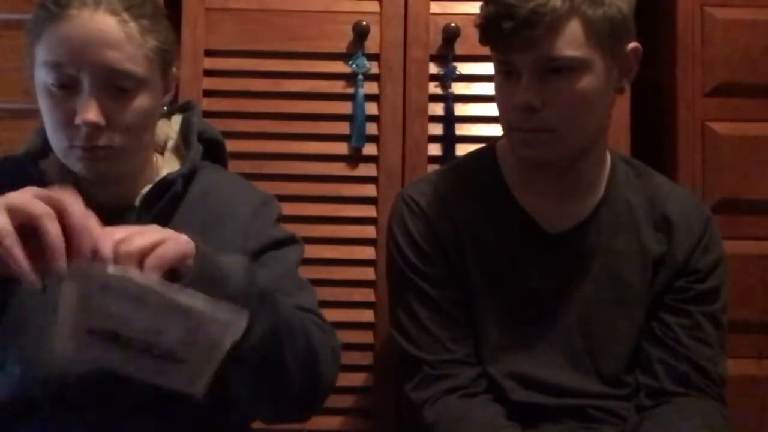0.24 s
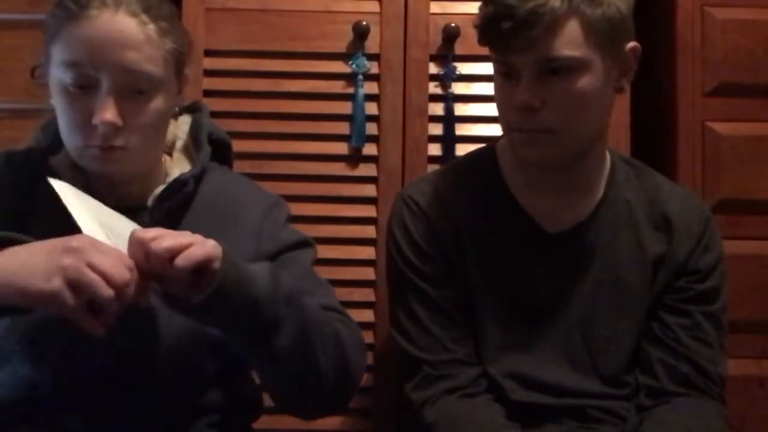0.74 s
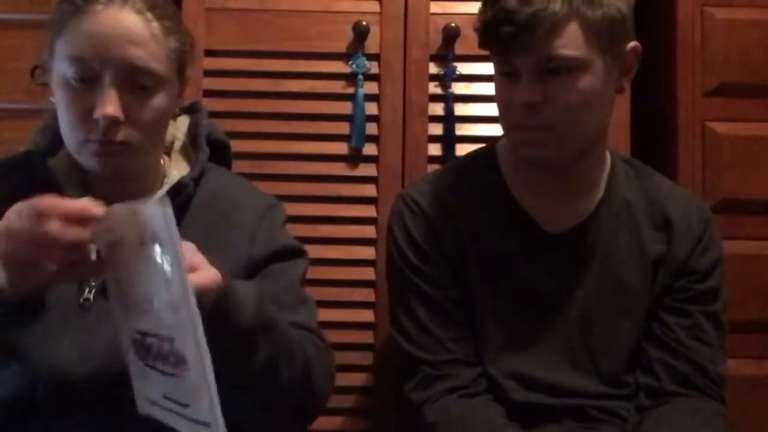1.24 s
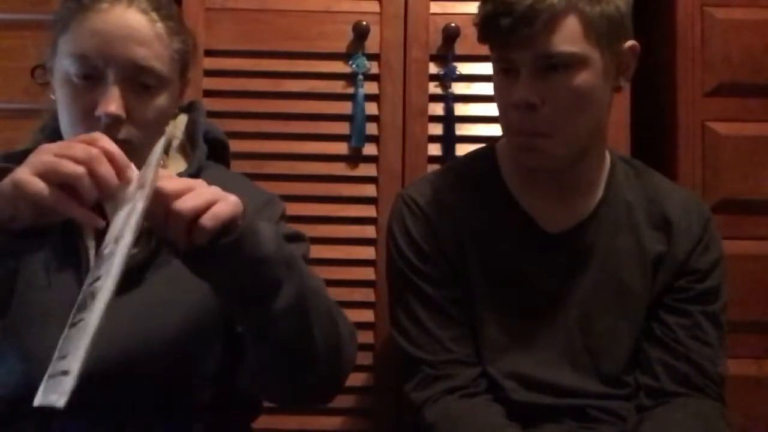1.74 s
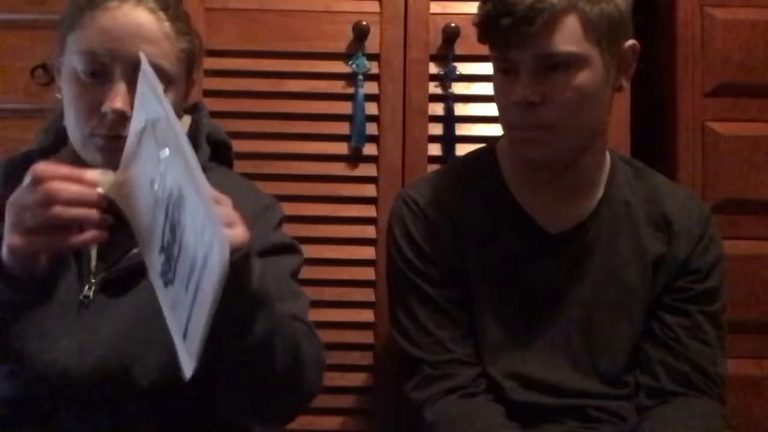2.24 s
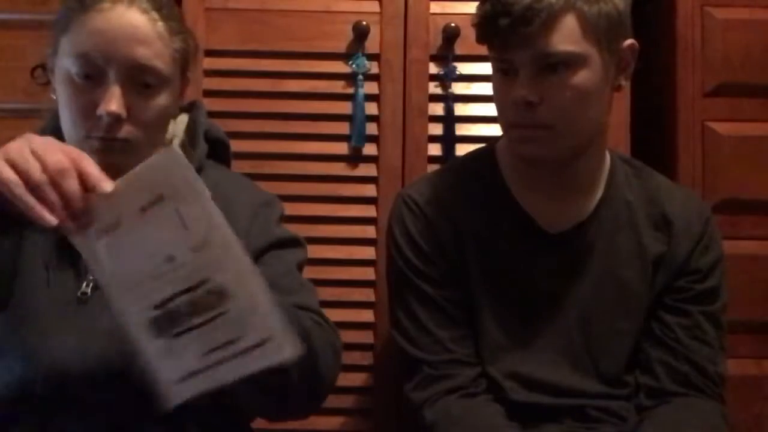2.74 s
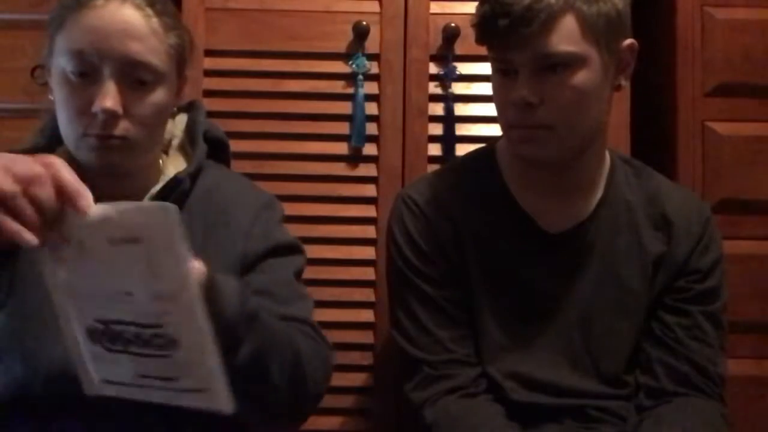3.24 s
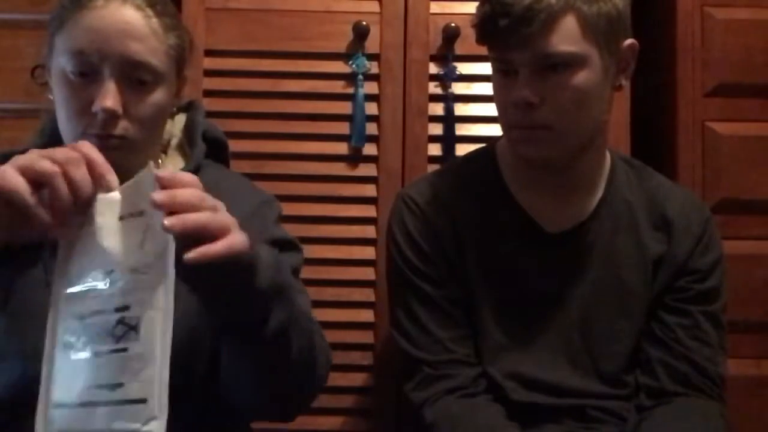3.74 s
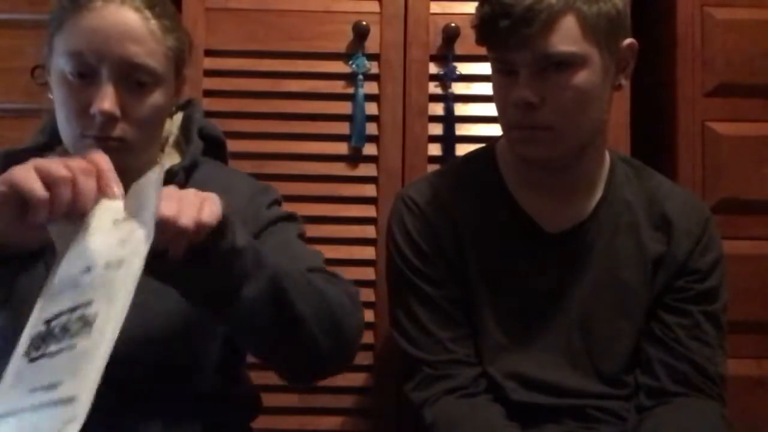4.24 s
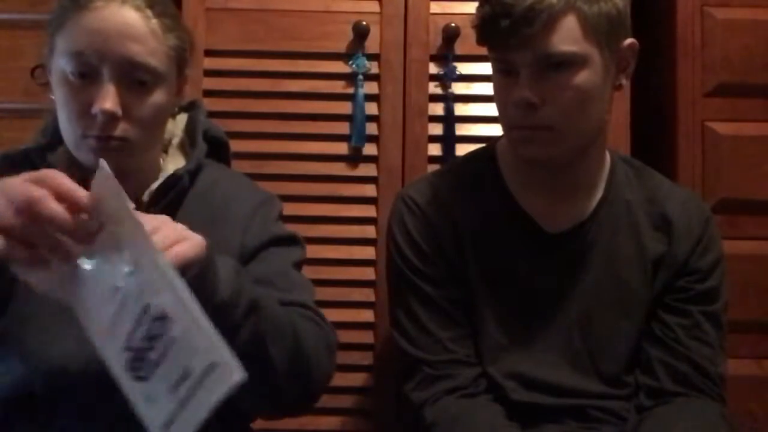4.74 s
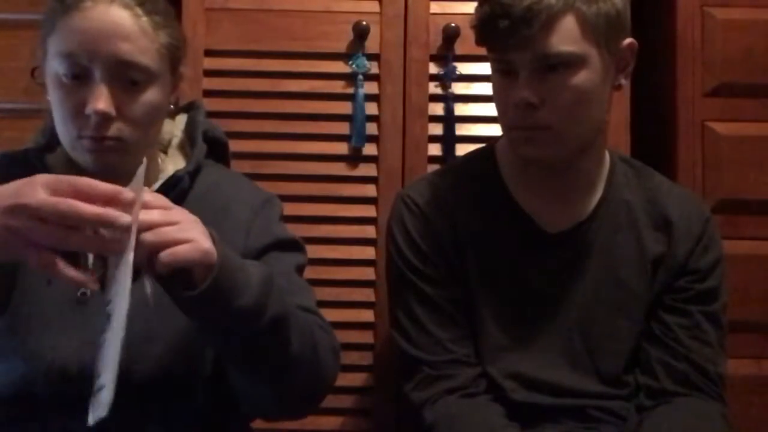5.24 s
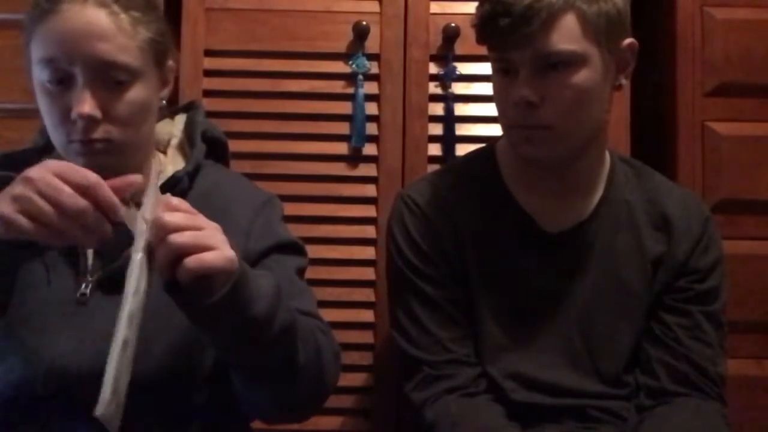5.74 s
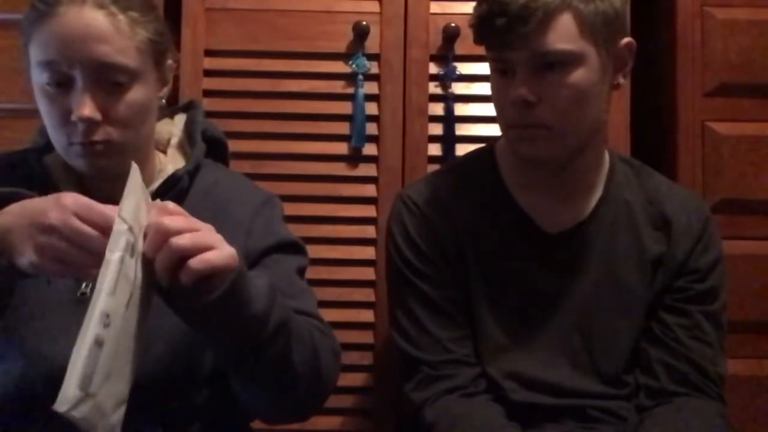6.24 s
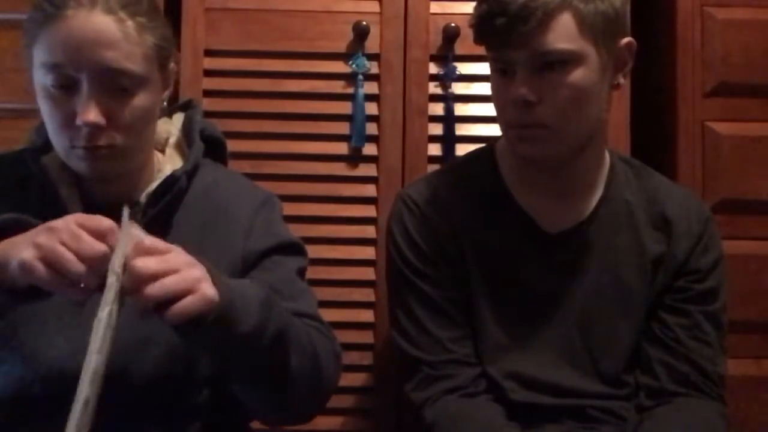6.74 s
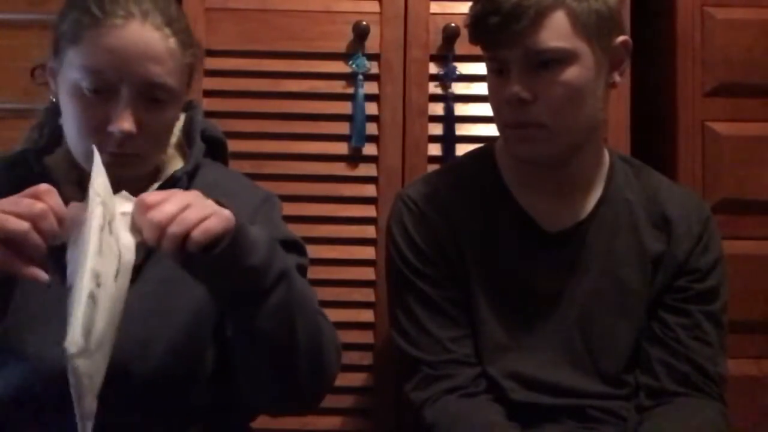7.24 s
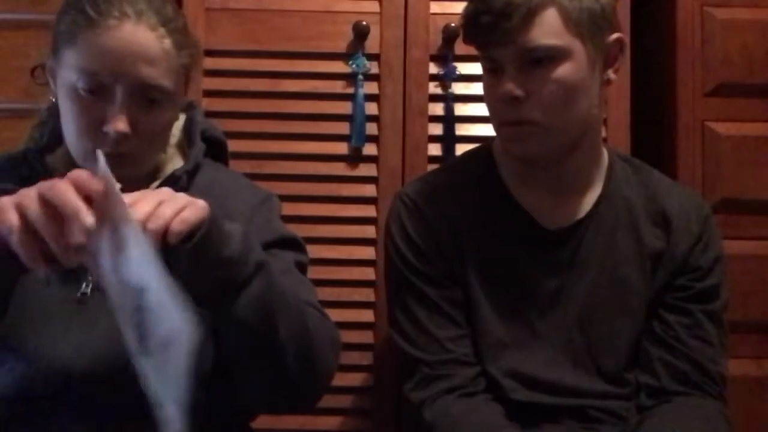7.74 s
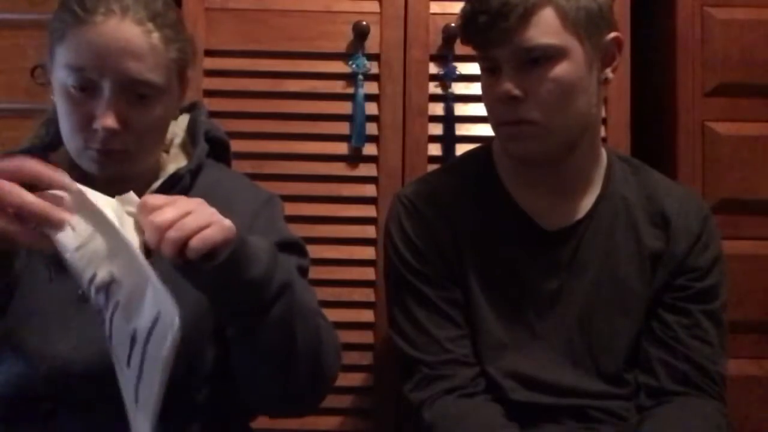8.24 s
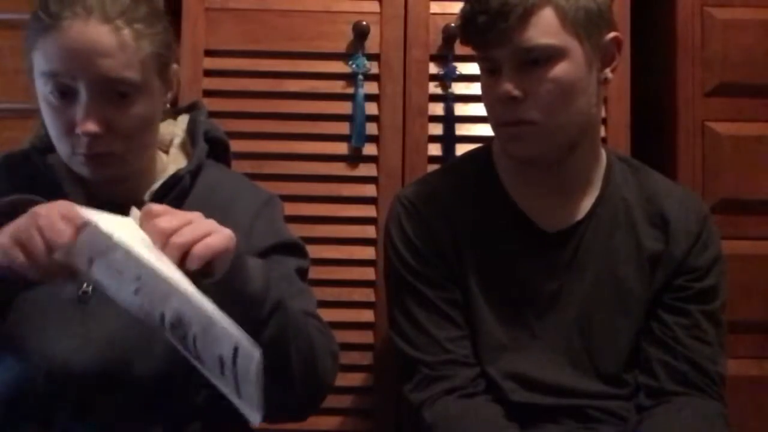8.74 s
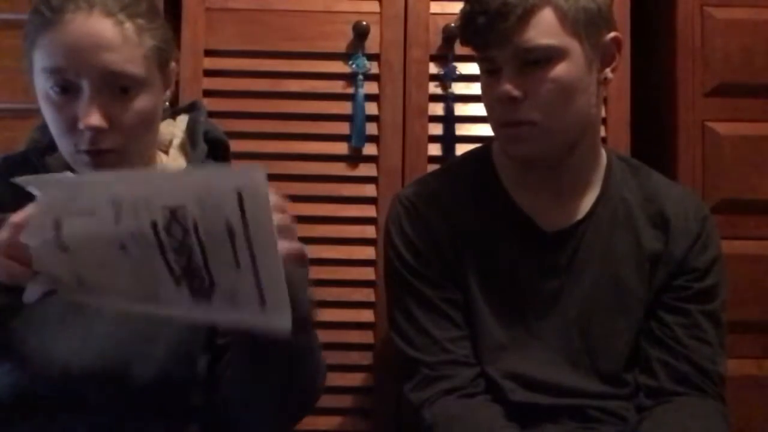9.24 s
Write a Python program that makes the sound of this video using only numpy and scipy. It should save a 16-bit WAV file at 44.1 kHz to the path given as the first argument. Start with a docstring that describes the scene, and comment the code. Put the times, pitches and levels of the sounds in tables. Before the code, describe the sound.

A stiff envelope is flexed and torn in jerky pulls: an opening crackle, a burst at one second, a stronger rip just after two, and sharp loud snaps a little past four. Quieter creasing follows before another crunchy burst at eight and sparse pops with faint thuds. Near microphone in a small room, with low hum and soft hiss underneath.

```python
"""Hands tear open and crumple a padded paper envelope: pulls are dense showers of tiny decaying tones.
Creases snap one by one, each a short ring with a crack, a scrunch and a falling flap of the sheet.
A small room answers with near echoes and a scattered tail; a few soft bass thuds come late.
Underneath lie a low hum, made of two sines that drift in pitch, and a steady hiss of filtered noise."""
import sys
import numpy as np
from scipy import signal
from scipy.fft import rfft, irfft
from scipy.io import wavfile
from scipy.ndimage import uniform_filter1d

SR = 44100
rng = np.random.default_rng(int(sys.argv[2]) if len(sys.argv) > 2 else 0)


def output_pcm(signal):
    """Save a mono or channel-first signal as 16-bit PCM at the path in sys.argv[1].

    Samples are clipped to [-1, 1] before scaling.
    """
    pcm = np.clip(np.atleast_2d(signal).T, -1, 1) * 32767
    wavfile.write(sys.argv[1], SR, np.round(pcm).astype(np.int16))


N = 418068  # length of the scene in samples

# Creases that buckle, levels before the room answers: (time [s], peak level [dB], ring pitch [Hz],
# bright crack relative to the peak [dB], low flap relative to the peak [dB])
CREASE_SNAPS = [(0.0185, -22.5, 2640, -24, -22), (0.1406, -48, 2220, 3, -16),
                (0.3082, -48, 2460, 16.5, -32), (0.4811, -31.5, 1630, -18, -15.5),
                (0.6057, -40, 2460, -6, -30), (0.722, -37, 2960, -16, -24), (0.7755, -35.5, 3320, 15, -54),
                (0.794, -31.5, 2900, -14, -31), (0.8204, -32.5, 2950, -20, -24),
                (0.8356, -34, 2800, -22, -19.5), (0.9266, -42, 2620, -7, -30),
                (0.974, -26.5, 2630, 9, -17.5), (1.006, -29.5, 2780, 5, -25), (1.068, -27.5, 2700, 4, -28),
                (1.0864, -30, 2410, 6, -38), (1.1062, -26, 2700, -7, -41), (1.1325, -29, 2900, -1, -40),
                (1.209, -39.5, 3400, -16, -23), (1.3029, -37, 1650, 3, -15.5),
                (1.4568, -43.5, 2240, 6.5, -14), (1.725, -48, 2140, -18, -25),
                (1.9414, -46, 2760, 10.5, -30), (1.9808, -38.5, 2840, 9, -43), (1.993, -27.5, 2900, 1, -49),
                (2.0496, -51, 1810, 10, -29), (2.07, -35, 1360, 9, -35), (2.11, -25, 1960, 0, -43),
                (2.1332, -21.5, 2800, -7, -41), (2.1487, -43, 2950, 8, -12), (2.17, -24.5, 3370, 2, -38),
                (2.2171, -33, 1360, 4, -24), (2.2316, -27.5, 1420, 3, -27), (2.3804, -26, 1300, -17, -13.5),
                (2.4015, -16, 5770, -2, -43), (2.45, -41.5, 1110, -15, -10), (2.5039, -33, 1510, -20, -38),
                (2.5427, -30.5, 1620, -9, -14), (2.8005, -30.5, 1340, -22, -19.5),
                (2.834, -34, 1270, -12, -20), (2.939, -27, 1370, -15, -27), (2.964, -16, 2680, -25, -46),
                (3.0422, -25.5, 2780, -31, -17.5), (3.1614, -35, 2450, 10, -11),
                (3.2163, -26.5, 1860, -3, -17.5), (3.2617, -33, 1350, -4, -15),
                (3.3661, -29.5, 2200, 1.5, -38), (3.5697, -44, 2640, -2, -12),
                (3.638, -39.5, 1360, -10, -13), (3.7849, -52, 2680, 14, -15), (3.808, -44, 3400, 13.5, -32),
                (3.8683, -43, 2820, 5, -33), (3.9197, -29.5, 3400, -4, -18.5),
                (4.1994, -27, 2760, 3.5, -34), (4.2125, -38, 1980, 9, -16), (4.2312, -8.5, 2960, -5, -55),
                (4.265, -23.5, 2150, -1, -38), (4.3085, -31.5, 1300, 9.5, -31), (4.3348, -39, 990, 16, -21),
                (4.3413, -30, 1250, 18.5, -15), (4.3483, -29, 1310, 11, -21), (4.367, -23, 1330, -11, -25),
                (4.3763, -16.5, 2760, -1, -36), (4.4046, -14.5, 4090, 3.5, -26),
                (4.425, -21.5, 2860, 3, -40), (4.474, -32, 3340, 8, -32), (4.5005, -36, 1150, 8, -40),
                (4.6175, -26, 1400, 4.5, -23), (4.915, -36, 1975, 0, -20), (4.9833, -46, 2620, -12, -32),
                (5.0423, -35, 1320, -1, -42), (5.1007, -33.5, 1930, -17, -14),
                (5.2275, -40.5, 1690, -10, -24), (5.3802, -54.5, 2800, 10.5, -19),
                (5.4455, -36.5, 2520, -12, -16), (5.4526, -20, 1660, -27, -36.5),
                (5.621, -49.5, 1410, -6, -27), (5.864, -51.5, 1610, -13, -33),
                (5.9685, -36.5, 1318, -10, -17), (6.0511, -53, 3440, 16, -26), (6.1676, -43, 3550, -7, -28),
                (6.241, -44.5, 2715, -6, -32), (6.3278, -48.5, 937, -6, -30), (6.4122, -45, 1410, 1, -36),
                (6.6578, -29, 2440, 2, -48), (6.7405, -54, 2980, 9, -25), (6.8043, -30.5, 3500, -25, -24.5),
                (6.9254, -37, 1450, -10, -22), (6.9672, -18.5, 2730, -6.5, -33),
                (7.0087, -29.5, 2820, 3, -23), (7.129, -40, 3400, 6, -31), (7.1454, -51, 3160, 15.5, -23),
                (7.1776, -35, 1480, 12, -33), (7.217, -38.5, 2820, 6.5, -31), (7.26, -45, 1110, -12, -9),
                (7.306, -36, 1468, 5, -29), (7.3174, -18, 2840, -12, -41), (7.3182, -24, 1400, -18, -31),
                (7.355, -34.5, 1640, 4, -37), (7.397, -39.5, 1330, 11, -36), (7.4367, -38, 1440, 3, -49),
                (7.4747, -46, 1367, -13, -26), (7.5265, -39, 1340, -21, -42), (7.6651, -31, 1480, 6.5, -16),
                (7.7025, -28.5, 3530, -2.5, -18.5), (7.7677, -48, 1880, 2, -27),
                (7.8874, -29.5, 4000, -20, -22), (8.018, -33, 1330, -8, -22),
                (8.0272, -22.5, 1720, -11, -39), (8.0344, -26, 1790, -19, -29),
                (8.0532, -22.5, 1360, -7, -28), (8.06, -28, 1310, 2, -36), (8.068, -18.5, 1680, 6, -29),
                (8.085, -32, 1780, 10, -31), (8.1012, -19, 1340, 2, -29), (8.112, -23, 1370, -10, -25),
                (8.258, -40.5, 1050, 1, -30), (8.2958, -35, 860, -15, -34), (8.386, -42.5, 1134, -17, -30),
                (8.4078, -44, 950, 1, -11), (8.503, -42.5, 1310, 8, -0.5), (8.5472, -17, 2270, -15, -20.5),
                (8.5521, -22, 1110, -16, -39), (8.723, -34.5, 1710, -3, -13.5),
                (8.8382, -41, 1283, -33, -15), (8.8663, -39, 1395, 0, -10.5),
                (9.0934, -52.5, 4110, 15, -24), (9.124, -41.5, 1280, -6, -31),
                (9.1696, -25.5, 1540, -0.5, -13.5), (9.2628, -42.5, 1143, -18, -6.5),
                (9.4042, -44, 2760, 1.5, -15), (9.454, -40, 1110, -23, -9)]


def amp(db):
    """Turns decibels into a gain."""
    return 10 ** (np.asarray(db) / 20)


def evened(x):
    """Scales a sound so that its rms (average strength) is 1."""
    return x / np.sqrt(np.mean(x ** 2) + 1e-20)


def read(points, hz):
    """Reads a curve of (frequency, value) points, with frequency on a log scale."""
    point_hz, value = np.transpose(points)
    return np.interp(np.log(hz + 1), np.log(point_hz + 1), value)


def add(mix, start_s, sound):
    """Adds a sound to the mix at a start time, cutting off what runs past the end."""
    part = mix[max(round(start_s * SR), 0):][:len(sound)]
    part += sound[:len(part)]


def ping(hz, cycles, phase, size):
    """A soft-starting oscillation that dies within a few cycles, peak 1."""
    u = np.arange(size) / SR * hz / cycles
    wave = u * np.exp(-2.5 * u) * np.cos(2 * np.pi * (u * cycles + phase))
    return wave / abs(wave).max()


def drift(rate):
    """Random wander of rms 1: noise averaged twice over 1/rate seconds."""
    width = int(SR / rate)
    once = uniform_filter1d(rng.standard_normal(N), width)
    return evened(uniform_filter1d(once, width))


def papery(x):
    """Gives a sound the colour of paper; the filter's phase follows from its log gain, so it never rings early."""
    # colour of the paper: (frequency [Hz], level per Hz [dB])
    paper_colour = [(88, -50.5), (150, -11), (475, -11), (566, -4), (716, -4.5), (1120, -6), (1340, 3),
                    (2020, 0.5), (2760, 2.5), (5050, -5), (9440, -3), (13700, -8), (16000, -14)]
    hz = abs(np.fft.fftfreq(4096, 1 / SR))
    log_gain = np.log(amp(read(paper_colour, hz)))
    response = np.exp(np.conj(signal.hilbert(log_gain)))
    taps = np.fft.ifft(response).real[:1024]
    taps = taps.reshape((1,) * (x.ndim - 1) + (-1,))  # works for one sound or a stack of sounds
    return signal.oaconvolve(x, taps, axes=-1)[..., :x.shape[-1]]


def pulls():
    """Each pull of the hand swells, holds and slackens; returns each grain family's gain over time."""
    # pulls that tear or crumple: (time at full force [s], rise [s], hold [s], fall [s],
    # creases level [dB], fine fibres level [dB], broad sheet level [dB])
    hand_pulls = [(0.034, 0.13, 0.19, .1, -63.5, -63, -74), (0.307, .15, .01, 0.071, -58, -57, -72),
                  (0.566, 0.24, 0.068, 0.16, -61.5, -59.5, -71),
                  (0.842, 0.11, 0.096, 0.17, -62, -63.5, -65),
                  (0.981, 0.0084, 0.033, 0.06, -47.5, -38, -57.5),
                  (1.092, 0.086, 0.032, 0.051, -45.5, -45.5, -54), (1.3, .05, .02, 0.08, -86, -63, -67),
                  (1.455, 0.13, .45, .1, -68.5, -73, -79), (1.958, 0.071, 0.076, .1, -59, -57.5, -66),
                  (2.072, 0.11, 0.068, .1, -46, -39.5, -59),
                  (2.143, 0.064, 0.0089, 0.15, -33.5, -30.5, -40.5),
                  (2.213, 0.092, 0.033, 0.059, -53, -45, -56), (2.405, 0.016, .01, 0.084, -46, -43, -57),
                  (2.533, 0.056, .01, 0.033, -49, -53.5, -52),
                  (2.616, 0.093, 0.0093, 0.16, -54, -55.5, -73), (2.78, 0.57, 0.047, 0.21, -57, -66, -61.5),
                  (2.939, .02, 0.017, 0.16, -42.5, -44.5, -45.5),
                  (3.038, 0.28, .01, 0.058, -51, -52.5, -57), (3.16, 0.01, 0.12, 0.12, -44.5, -42, -49.5),
                  (3.399, .05, 0.051, 0.077, -68, -64, -69), (3.66, 0.2, 0.32, 0.12, -63, -66.5, -72),
                  (4.022, 0.046, .04, 0.16, -55, -61.5, -61), (4.225, 0.041, .03, 0.16, -42.5, -47, -48.5),
                  (4.376, 0.13, 0.046, 0.055, -39, -37, -42),
                  (4.469, 0.066, 0.04, 0.082, -49.5, -48, -49.5),
                  (4.634, 0.085, .01, 0.077, -53.5, -55.5, -55),
                  (4.813, 0.17, 0.11, 0.12, -59.5, -59.5, -63.5),
                  (5.04, 0.15, 0.094, 0.12, -54, -60.5, -63), (5.231, 0.05, 0.0088, 0.045, -60, -60, -69),
                  (5.38, 0.14, 0.056, .1, -65, -63, -69), (5.458, 0.043, .01, 0.1, -52, -56.5, -52.5),
                  (5.53, .05, 0.056, 0.11, -69.5, -73.5, -85), (6.01, 0.16, 0.11, 0.17, -67, -67, -74),
                  (6.178, 0.03, 0.015, 0.14, -56.5, -56.5, -83), (6.494, 0.14, 0.044, 0.19, -60, -60, -68),
                  (6.654, 0.032, .01, .07, -54, -54, -63), (6.807, 0.081, 0.039, .2, -59, -58.5, -83),
                  (6.943, 0.12, 0.038, 0.19, -51, -49, -62.5), (7.134, .02, 0.036, .05, -74, -57.5, -82),
                  (7.174, 0.011, .02, 0.27, -56, -51.5, -61), (7.305, 0.032, .03, 0.16, -49.5, -48.5, -55),
                  (7.697, 0.18, .04, 0.15, -56, -55, -65), (7.834, 0.07, 0.053, .08, -58, -53.5, -68),
                  (8.035, 0.047, 0.082, 0.052, -39.5, -38, -45),
                  (7.567, 0.033, 0.059, 0.088, -59.5, -61.5, -68), (8.295, 0.15, .02, .08, -61, -63, -57.5),
                  (8.508, 0.13, 0.014, 0.12, -60, -59, -61), (8.547, 0.009, 0.014, 0.074, -41.5, -44, -49),
                  (8.61, 0.16, 0.14, 0.38, -60, -59.5, -62.5),
                  (8.863, 0.072, 0.008, 0.16, -62.5, -60.5, -82),
                  (9.038, .25, 0.041, 0.17, -58.5, -57.5, -60),
                  (9.166, 0.022, 0.0086, 0.094, -48.5, -51.5, -56),
                  (9.406, 0.014, .07, .1, -61, -66, -66.5)]
    # fingers never rest: (creases level [dB], fibres level [dB], sheet level [dB])
    fidget_db = (-81, -83, -84)
    slack_db = -25  # level at the ends of a pull's rise and fall, relative to full force
    t = np.arange(0, N, 32) / SR  # a coarse clock is enough for hand motion
    s, rise, hold, fall, *levels = np.transpose(hand_pulls)[:, :, None]
    before = (s - t) / rise
    after = (t - s - hold) / fall
    slack = np.maximum(np.maximum(before, after), 0)
    gains = []
    for db, rest_db in zip(levels, fidget_db):
        # doubled decibels give powers, which add up
        power = amp(2 * rest_db) + amp(2 * (db + slack_db * slack)).sum(0)
        gains.append(np.interp(np.arange(N) / SR, t, np.sqrt(power)))
    return gains


def showers():
    """A snap sets a rip running: fibres break at once and thin out; returns the rip's gain over time."""
    shower_db = -44.5  # relative to the snap's peak
    rip, fade = np.zeros(N), np.exp(-np.arange(4000) / SR / 0.014)
    for s, db, *_ in CREASE_SNAPS:
        add(rip, s, amp(db + shower_db) * fade)
    return rip


def grains(lo_hz, hi_hz, cycles, rate, spread_db, clumps):
    """Short pings at random moments and pitches; a few are large, and they come in clumps."""
    strikes = rng.random(N) < rate / SR
    size = amp(spread_db * np.minimum(rng.exponential(1, N), 3)) * strikes * clumps
    pitches = np.geomspace(lo_hz, hi_hz, num=12)
    which, out = rng.integers(0, len(pitches), N), np.zeros(N)
    # as the sheet bends, other pitches come forward every tenth of a second
    bend = amp(4.0 * uniform_filter1d(rng.standard_normal((len(pitches), 100)), size=2, axis=0))
    bend = bend / np.sqrt(np.mean(bend ** 2, axis=0))
    for k, hz in enumerate(pitches):
        shape = np.diff(ping(hz, cycles, rng.random(), size=1024))
        shape = np.sqrt(hz) * shape / np.linalg.norm(shape)
        favour = np.interp(np.linspace(0, 99, N), np.arange(100), bend[k])
        out += signal.oaconvolve(size * favour * (which == k), shape)[:N]
    return evened(papery(out))


def rustle():
    """Fibres break in uneven jerks of the hand; creases, fibres and the whole sheet share them."""
    # grain families: (lowest pitch [Hz], highest pitch [Hz], length [cycles], rate [grains/s], size spread [dB])
    creases = (900, 4500, 2.2, 3000, 3.2)
    fibres = (4500, 15000, 2.5, 7000, 3.3)
    sheet = (200, 900, 1.2, 900, 2.5)
    clumps = amp(2.6 * drift(300) + .6 * drift(50))
    rip = showers()
    rip_shares = amp([0, -3, -12])  # the rip's share of each family
    out = np.zeros(N)
    for family, gain, share in zip((creases, fibres, sheet), pulls(), rip_shares):
        out += (gain + share * rip) * grains(*family, clumps)
    return out


def hum():
    """A low tone that flutters in pitch and level, with a faint octave above."""
    # course of the low tone before its flutter: (time [s], pitch [Hz], rms level [dB])
    hum_course = [(0.0, 76.4, -66.5), (0.47, 75.6, -63), (1.24, 76.2, -67.5), (2.17, 71.7, -69),
                  (4.36, 72.0, -67.5), (4.96, 69.7, -70.5), (5.94, 71.6, -65), (9.32, 70.8, -70),
                  (9.48, 65.3, -67)]
    s, hz, db = np.transpose(hum_course)
    t = np.arange(N) / SR
    pitch = np.interp(t, s, hz) + .8 * drift(5)
    level = np.interp(t, s, db) + .8 * drift(10)
    turns = np.cumsum(pitch) / SR
    tone = np.sin(2 * np.pi * turns) + amp(-20.0) * np.sin(2 * np.pi * 2 * turns)
    return np.sqrt(2) * amp(level) * tone  # a sine peaks at root two times its rms


def hiss():
    """Steady noise of room and microphone: white noise with its spectrum reshaped."""
    # colour of the hiss, only its shape counts: (frequency [Hz], level per Hz [dB])
    hiss_colour = [(18, -27), (40, -14), (75, -2.5), (115, -9), (215, -9), (280, -12.5), (1540, -21),
                   (8080, -24.5), (13700, -30), (16000, -48)]
    hiss_db = -64  # rms, before the microphone
    white = rfft(rng.standard_normal(N))
    colour = amp(read(hiss_colour, np.fft.rfftfreq(N, 1 / SR)))
    return amp(hiss_db) * evened(irfft(white * colour, N))


def snaps():
    """Each crease rings for a few cycles, cracks, and sends a falling bending wave across the sheet."""
    ring_cycles = 1.37  # shortest ring; looser creases ring up to 45 % longer
    count = len(CREASE_SNAPS)
    out, t = np.zeros(N), np.arange(2000) / SR
    short_t = t[:300]
    luck = rng.random((count, 2))
    crack_fade = np.exp(-short_t / (0.00031 + 0.00007 * luck[:, 1:]))
    cracks = papery(rng.standard_normal((count, 300)) * short_t * crack_fade)
    cracks = signal.sosfilt(signal.butter(2, 3300, "high", fs=SR, output="sos"), cracks)
    # the buckle also shakes the paper around it: a short broad scrunch
    scrunches = papery(rng.standard_normal((count, 300)) * short_t * np.exp(-short_t / 0.0014))
    scrunches = signal.sosfilt(signal.butter(1, [700, 5000], "band", fs=SR, output="sos"), scrunches)
    # bending waves disperse: high pitches arrive first
    flap_hz = 95 + 600 * np.exp(-t / 0.00679)
    flap = np.sin(2 * np.pi * np.cumsum(flap_hz) / SR)
    flap = flap * np.exp(-t / 0.011) * (1 - np.exp(-t / 0.00011))
    flap = flap / abs(flap).max()
    for snap, (phase, loose), crack, scrunch in zip(CREASE_SNAPS, luck, cracks, scrunches):
        s, db, hz, crack_db, flap_db = snap
        add(out, s, amp(db) * ping(hz, ring_cycles * (1 + 0.45 * loose), phase, size=500))
        add(out, s, amp(db + crack_db) * crack / abs(crack).max())
        add(out, s, amp(db - 8.5) * scrunch / abs(scrunch).max())
        add(out, s, amp(db + flap_db) * flap)
    return out


def tail():
    """A few near echoes, then sparse taps of random sign, each band dying at its own speed."""
    # time to fade by 60 dB: (frequency [Hz], fade time [s])
    fade_times = [(200, 0.16), (530, 0.1), (1390, 0.25), (3680, 0.47), (9700, 0.25)]
    # echoes from body and walls, before a random shift of up to 30 %: (delay [s], level [dB])
    near_echoes = [(.0016, -14), (.004, -11), (.0105, -14), (.0135, -14)]
    taps = np.zeros(SR // 2)
    at = np.arange(300, len(taps) - 20, 20)
    taps[at + rng.integers(0, 20, len(at))] = rng.choice([-1., 1.], len(at))
    hz, t, bands = signal.stft(taps, SR, nperseg=256)
    fade_s = np.maximum(read(fade_times, hz), .05)[:, None]
    out = signal.istft(bands * amp(-60 * t / fade_s), SR, nperseg=256)[1]
    out = amp(-16.0) * out / np.linalg.norm(out)
    for s, db in near_echoes:
        add(out, s * rng.uniform(.7, 1.3), amp([db]))
    return out


def room(x):
    """The envelope keeps moving, so the sound fades between three paths through the room."""
    turn = np.pi * np.arange(N) / SR * 2.3
    out = x.copy()
    for k in range(3):
        path = np.sqrt(2 / 3) * np.cos(turn + k * np.pi / 3)  # the three powers always add up to 1
        out += signal.oaconvolve(x * path, tail())[:N]
    return out


def thuds():
    """A few soft thuds, each a few quickly dying cycles of bass."""
    # low soft thuds, before the microphone: (time [s], pitch [Hz], peak level [dB])
    bass_thuds = [(8.56, 75, -48), (9.181, 75.6, -52), (9.421, 121, -50)]
    out = np.zeros(N)
    for s, hz, db in bass_thuds:
        add(out, s, amp(db) * ping(hz, 2.4, 0, size=6000))
    return out


def scene():
    """Paper in the room, with thuds, over the steady background."""
    paper = room(snaps() + rustle())
    return (paper + thuds() + hum() + hiss())[None]


def record(dry):
    """The microphone drops the deepest bass and softens the top; then the band limit."""
    cut = signal.sosfilt(signal.butter(5, 50, "high", fs=SR, output="sos"), dry)
    cut = signal.sosfilt(signal.butter(3, 14500, fs=SR, output="sos"), cut)
    band_limit = signal.firwin(511, 15900, window=("kaiser", 9), fs=SR)  # little passes above 15900 Hz
    return signal.oaconvolve(cut, band_limit[None], "same")


dry = scene()
out = record(dry)
output_pcm(out)
```